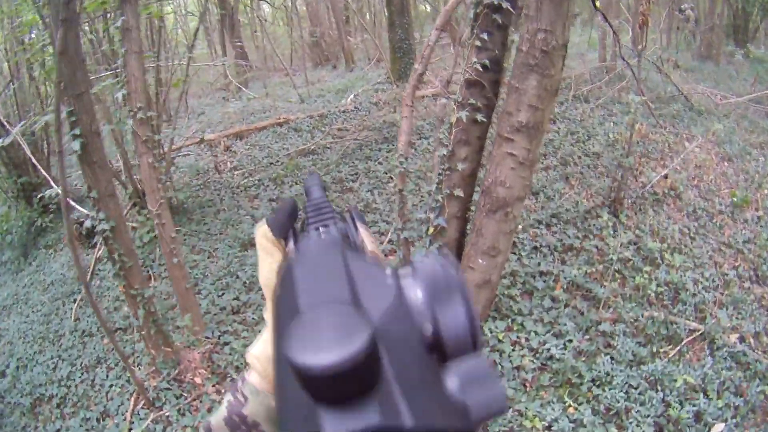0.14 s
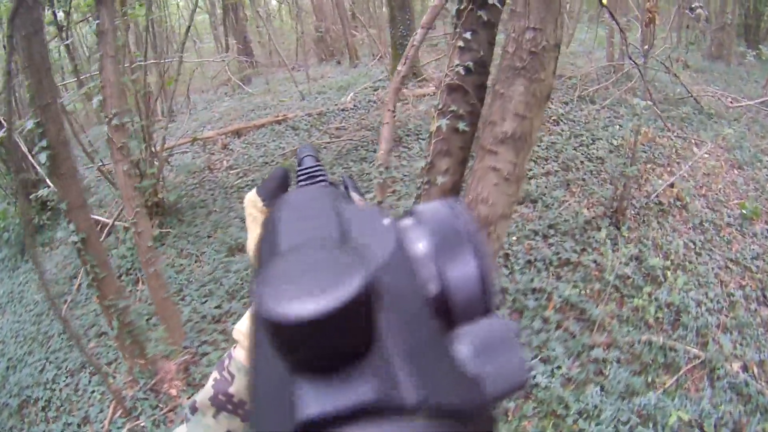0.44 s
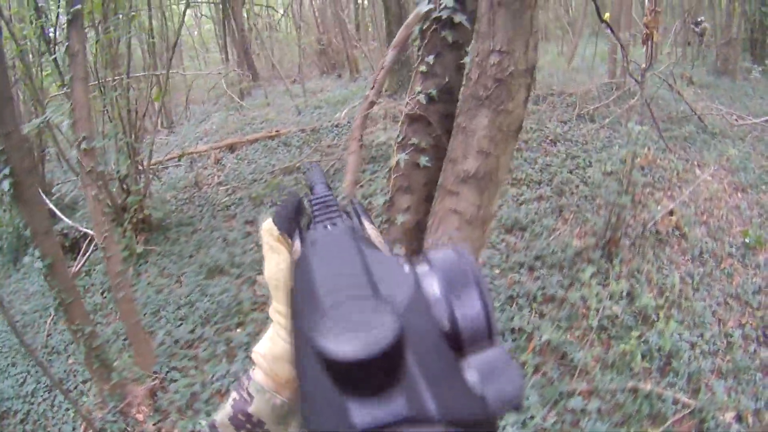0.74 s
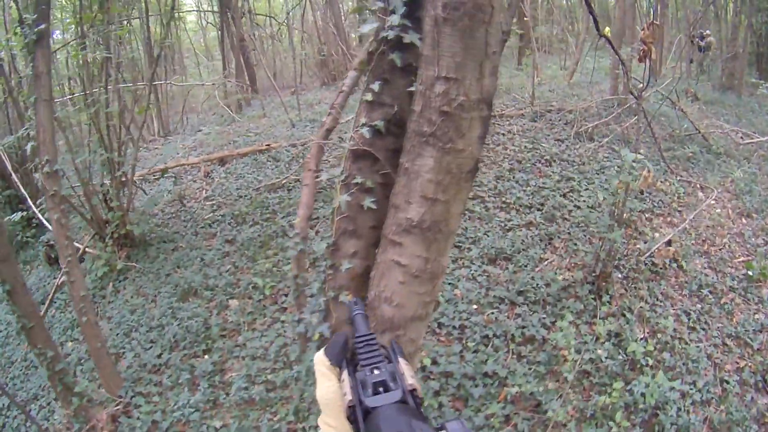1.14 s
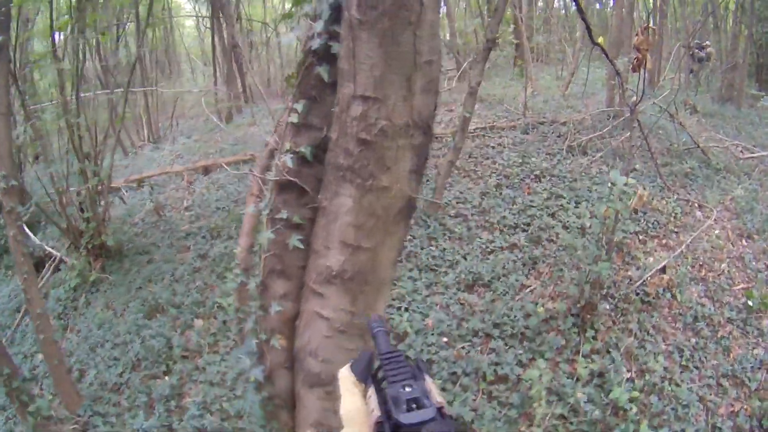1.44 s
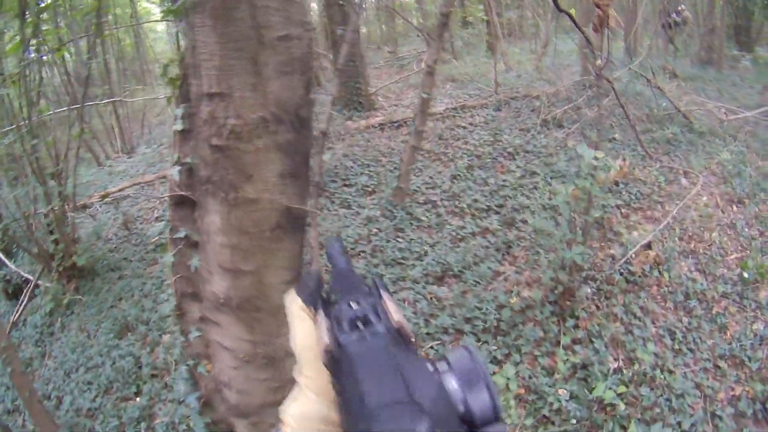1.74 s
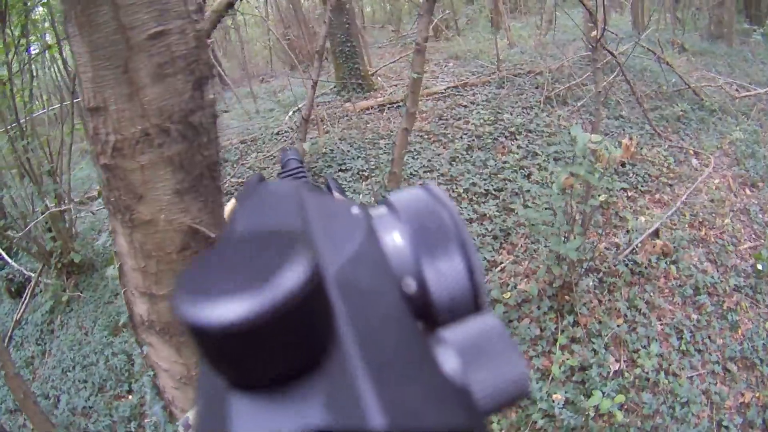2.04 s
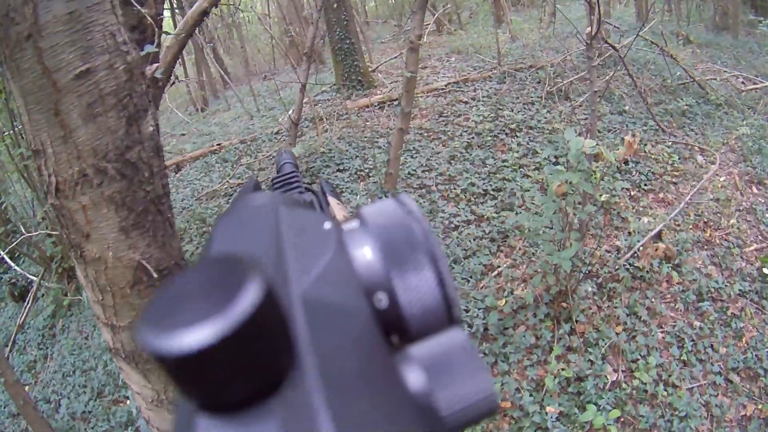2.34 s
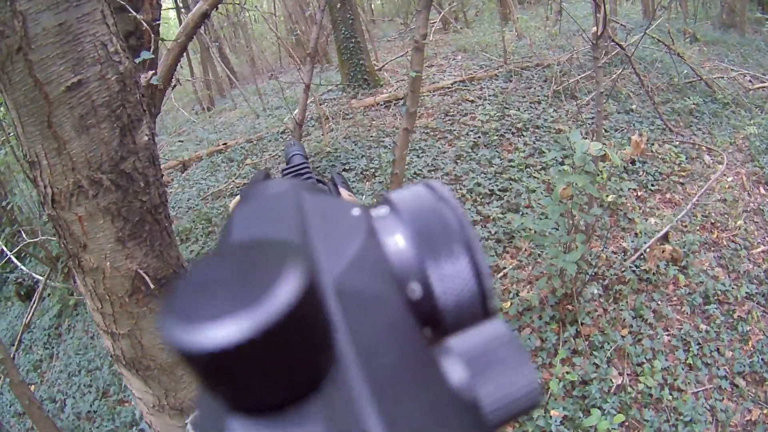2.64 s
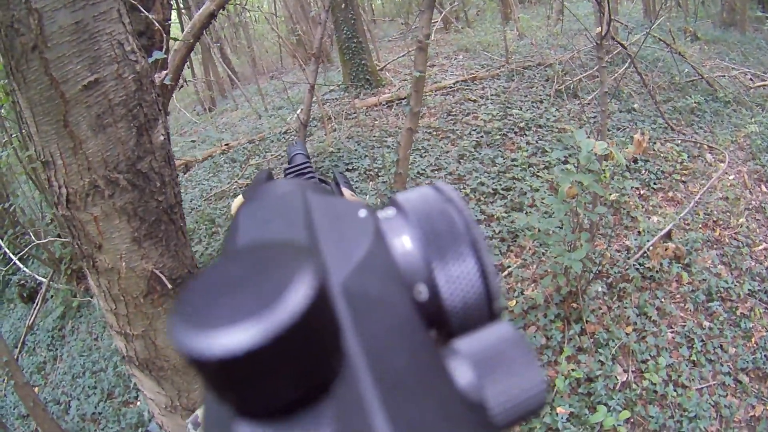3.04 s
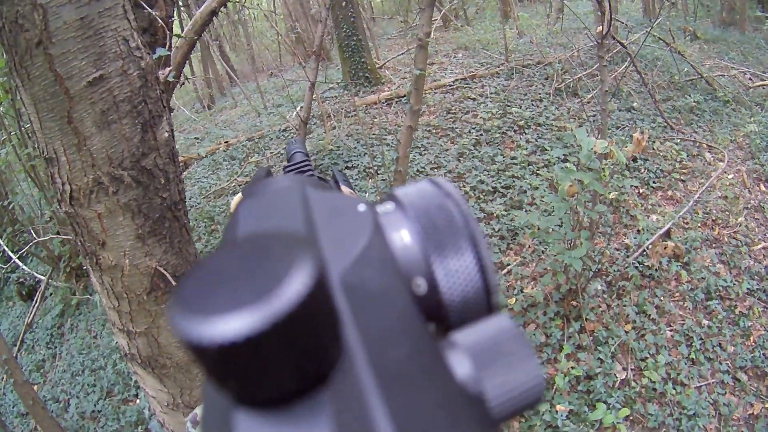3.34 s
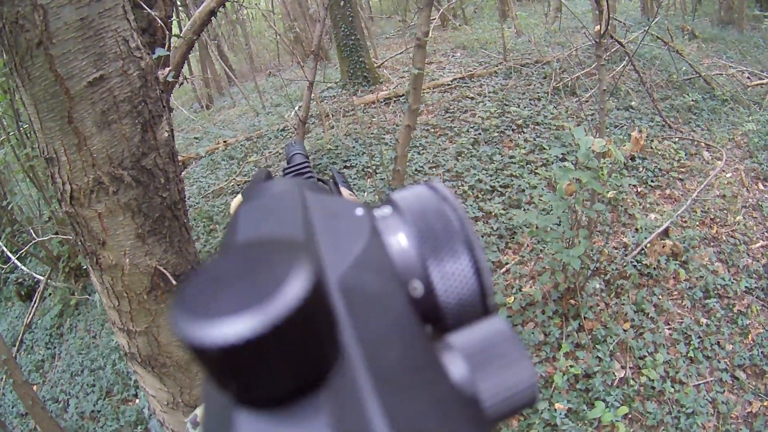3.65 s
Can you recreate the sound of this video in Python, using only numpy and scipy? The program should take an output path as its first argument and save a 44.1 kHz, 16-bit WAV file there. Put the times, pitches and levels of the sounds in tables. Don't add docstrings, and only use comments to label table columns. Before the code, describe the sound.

A toy rifle's motor whirrs and clatters through rapid bursts while distant bursts pop among trees

```python
import sys
import numpy as np
from scipy import signal
from scipy.fft import rfft, irfft, next_fast_len
from scipy.io import wavfile
from scipy.ndimage import uniform_filter1d

SR = 44100
rng = np.random.default_rng(int(sys.argv[2]) if len(sys.argv) > 2 else 0)


def makeup_ratio(level_db):
    decades = np.asarray(level_db, float) / 20
    return 10 ** decades


def unload_audio(sound):
    columns = np.transpose(np.atleast_2d(sound))
    steps = np.round(np.clip(columns, -1, 1) * 32767)
    wavfile.write(sys.argv[1], SR, steps.astype(np.int16))


N = 167580
T = np.arange(N) / SR


def unit(x):
    return x / np.sqrt(np.mean(x ** 2) + 1e-20)


def along(points, hz):
    f, v = np.transpose(points)
    return np.interp(np.log(hz + 1), np.log(f + 1), v)


def filtered(x, response):
    m = next_fast_len(len(x) + 8192)
    return irfft(rfft(x, m) * response(np.fft.rfftfreq(m, 1 / SR)), m)[:len(x)]


def resonances(peaks):
    def response(f):
        total = 0
        for k, (centre, width, db) in enumerate(peaks):
            total = total + (-1) ** k * makeup_ratio(db) * 1j * f * width / (centre ** 2 - f ** 2 + 1j * f * width)
        return total
    return response


def hiss(spectrum, patchy_db):
    z = signal.stft(rng.standard_normal(N), nperseg=128)[2]
    field = rng.standard_normal(z.shape)
    field = uniform_filter1d(uniform_filter1d(field, 4, 0), 3, 1)
    x = signal.istft(z * makeup_ratio(patchy_db * unit(field)), nperseg=128)[1][:N]
    return unit(filtered(x, lambda hz: makeup_ratio(along(spectrum, hz))))


def fall(s, t60):
    return (T >= s) * makeup_ratio(-60 * np.abs(T - s) / t60)


def add(out, s, x):
    part = out[round(s * SR):][:len(x)]
    part += x[:len(part)]


# (frequency [Hz], spectrum level [dB])
AIR_SPECTRUM = [(15, 3), (25, -1), (290, -21.5), (409, -26), (735, -27), (1040, -20), (1250, -22.5),
                (8070, -23), (14500, -27)]


def air():
    tone = np.sin(2 * np.pi * 1011 * T)
    return makeup_ratio(-59) * hiss(AIR_SPECTRUM, patchy_db=3.0) + makeup_ratio(-73) * tone


SHOT_DELAY_S = .0008
# (time [s], peak level [dB], treble level [dB])
FAR_SHOTS = [(0.1115, -34, 7), (0.165, -31.5, 3), (0.2153, -32.5, 3.5), (0.8733, -35.5, 4.5),
             (0.9244, -38, 9.5), (1.0166, -34, 4.5), (1.07, -33.5, 5), (1.1212, -32, 3.5), (1.2207, -32, 4),
             (1.273, -31, 3), (1.3243, -32.5, 6.5), (1.4212, -31, 3.5), (1.474, -32, 5), (1.5257, -30.5, 4),
             (1.6131, -32, 4.5), (1.6663, -31, 5), (1.716, -33.5, 6.5), (1.7982, -33, 6.5),
             (1.8513, -33.5, 8.5), (1.9016, -30, 2), (2.0118, -31.5, 4.5), (2.067, -30, 3.5),
             (2.117, -29, 3), (2.2842, -32.5, 8), (2.3381, -31, 4), (2.389, -31, 2.5), (2.5179, -31.5, 7)]
# (time [s], peak level [dB], treble level [dB])
FAINT_SHOTS = [(0.0553, -60, 5), (0.8175, -37, 6), (0.9525, -57, 21), (1.5044, -59, 5), (1.5722, -57, 15),
               (1.8555, -43.5, 18), (1.9403, -55.5, 20), (2.1918, -36, -2), (2.2374, -43.5, 6),
               (2.2549, -37, -8), (2.2749, -41.5, 6), (2.3105, -41, -10), (2.3665, -36, -7),
               (2.3783, -44, 13.5), (2.4226, -38, -14), (2.4792, -39, 1)]
# (frequency [Hz], width [Hz], level [dB])
MUZZLE_MODES = [(737, 113, 2.5), (1974, 280, 3), (3900, 6000, -11.5)]
# (frequency [Hz], width [Hz], level [dB])
SNAP_MODES = [(7900, 1300, -3), (11500, 3000, -16)]
# (delay [s], body level [dB], treble level [dB])
REFLECTIONS = [
    (.0012, -20, -4),
    (.0024, -22, -8),
    (.004, -14, -6),
    (.0072, -5, -13),
    (.013, -12, -14),
    (.018, -15, -13),
]


def far_rifle():
    pops, snaps = np.zeros(N), np.zeros(N)
    arrivals = [(0.00016, 0, 0)] + REFLECTIONS
    k = np.arange(22)
    for s, db, treble_db in FAR_SHOTS + FAINT_SHOTS:
        for i, (delay, body_db, bright_db) in enumerate(arrivals):
            late, loud = rng.standard_normal(2)
            at = s + SHOT_DELAY_S + delay * (1 + 0.041 * late)
            add(pops, at, -makeup_ratio([db + body_db + 2.1 * loud * (delay > 0)]))
            signs = np.sign(rng.standard_normal(22))
            grains = signs * makeup_ratio(2.5 * rng.standard_normal(22) - .7 * k)
            add(snaps, at, makeup_ratio(db + treble_db + bright_db) * grains)

    def muzzle(f):
        low_cut = (1j * f / (493 + 1j * f)) ** 2
        return resonances(MUZZLE_MODES)(f) * low_cut

    return makeup_ratio(23) * filtered(pops, muzzle) + makeup_ratio(15.5) * filtered(snaps, resonances(SNAP_MODES))


# (frequency [Hz], spectrum level [dB])
TREE_SPECTRUM = [(400, -32.5), (780, -18), (1250, -35.5), (2100, -17), (3300, -21.5), (5000, -14.5),
                 (8000, -9.5), (14000, -5.5)]
# (frequency [Hz], t60 [s])
TREE_DECAY = [(700, 0.81), (2000, 0.57), (8000, 0.57), (13000, 0.42)]


def trees():
    wash = np.zeros(N)
    for s, db, treble_db in FAR_SHOTS + FAINT_SHOTS:
        hz, t, z = signal.stft(rng.standard_normal(SR // 2), SR, nperseg=128)
        decay_db = -60 * t / along(TREE_DECAY, hz)[:, None]
        level_db = along(TREE_SPECTRUM, hz)[:, None] + decay_db + 0.85 * rng.standard_normal(z.shape)
        tail = signal.istft(z * makeup_ratio(level_db), SR, nperseg=128)[1]
        add(wash, s + SHOT_DELAY_S, makeup_ratio(db + treble_db) * tail / np.std(tail[:999]))
    return makeup_ratio(-10) * wash


# (time [s], length [s], start frequency [Hz], end frequency [Hz], level [dB])
SPIN_UPS = [
    (.306, .03, 800, 1000, -44),
    (2.546, .031, 930, 1270, -38),
]


def motor_spin_up():
    out = np.zeros(N)
    for s, length, from_hz, to_hz, db in SPIN_UPS:
        t = np.arange(int(length * SR)) / SR
        phase = 2 * np.pi * (from_hz + (to_hz - from_hz) * t / length / 2) * t
        swell = np.sin(np.pi * (t / length) ** 2)
        add(out, s, makeup_ratio(db) * swell * (np.sin(phase) + .6 * np.sin(3.0 * phase)))
    return out


# (time [s], peak level [dB])
RATCHET_TICKS = [(.3075, -36), (.3105, -38), (.3137, -23), (.3165, -25), (.7325, -18), (.7455, -19),
                 (.7592, -24), (.762, -26), (.770, -21), (.7865, -25), (.8147, -23), (.824, -35),
                 (.832, -34), (.838, -39)]
# (frequency [Hz], spectrum level [dB])
TICK_SPECTRUM = [(300, -54), (900, -6), (1700, -17), (4300, -8), (6000, -7), (14000, -3.5)]


def ratchet():
    strikes = sum(makeup_ratio(db) * fall(s, .019) for s, db in RATCHET_TICKS)
    return strikes * hiss(TICK_SPECTRUM, patchy_db=1.5)


# (motor on [s], motor off [s], rise time [s], gear level [dB])
TRIGGER_PULLS = [
    (.3203, .715, .002, -20.5),
    (2.558, 3.9, .002, -20.5),
]
# (frequency [Hz], spectrum level [dB])
GEAR_SPECTRUM = [(150, -35.5), (600, -24), (850, -8.5), (1200, -16), (1900, -17), (2350, -10), (3200, -8),
                 (14000, -4)]
SLAM_TIMES = [.3962, .473, .5477, .6222, .6983, 2.6084, 2.688, 2.7634, 2.8375, 2.9121, 2.9865, 3.0609,
              3.1353, 3.2095, 3.2837, 3.3581, 3.4323, 3.5066, 3.5808, 3.6548, 3.7292]


def gears():
    drive = np.zeros(N)
    for on_s, off_s, rise_s, db in TRIGGER_PULLS:
        coast = makeup_ratio(-60 * np.maximum(T - off_s, 0) / .2)
        drive += makeup_ratio(db) * np.clip((T - on_s) / rise_s, 0, 1) * coast
    caught = SLAM_TIMES[5:] + SLAM_TIMES[:4]
    jolt = 1 + makeup_ratio(-2.5) * sum(fall(s + .0185, t60=0.034) for s in caught)
    mesh = makeup_ratio(2 * np.sin(2 * np.pi * 137.8 * T))
    clatter = drive * jolt * mesh * hiss(GEAR_SPECTRUM, patchy_db=2)
    return filtered(clatter, lambda hz: makeup_ratio(-9 * np.exp(-((hz - 2750) / 90) ** 2)))


SLAM_DB = -30
# (frequency [Hz], spectrum level [dB])
RATTLE_SPECTRUM = [(120, -30), (300, -4.5), (800, -2.5), (1500, 13.5), (2200, -8), (3300, -17), (5000, -68),
                   (9000, -64)]


def rattle():
    out, loose = np.zeros(N), hiss(RATTLE_SPECTRUM, patchy_db=0.0)
    lead_s, length = .012, int(.04 * SR)
    swell = np.sin(np.pi * np.arange(length) / length)
    for s in SLAM_TIMES:
        start = s - lead_s
        add(out, start, makeup_ratio(SLAM_DB - 7) * swell * loose[round(start * SR):][:length])
    return out


# (delay [s], level [dB], crack level [dB], brightness [dB per octave])
SLAM_BLOWS = [
    (-.008, -13, -30, -2),
    (.0031, 4.5, -10, 3),
    (.0091, 7.5, -16, -.8),
    (.0128, -4, -26, -3),
]
# (frequency [Hz], level [dB], t60 [s])
SHELL_MODES = [(269, -15, 0.032), (410, -10.5, 0.052), (535, -1, 0.011), (674, 5.5, 0.019), (907, 8, 0.019),
               (1043, -6.5, 0.029), (1345, 5, 0.016), (1530, -29, 0.011), (1953, 11, 0.006)]


def piston_blows():
    out, t = np.zeros(N), np.arange(SR // 20) / SR
    crack = hiss(GEAR_SPECTRUM, patchy_db=3.4)
    attack = 1 - np.exp(-t / 0.00052)
    for s in SLAM_TIMES:
        for delay, blow_db, crack_db, tilt_db in SLAM_BLOWS:
            ring = np.zeros(len(t))
            for hz, level, t60 in SHELL_MODES:
                louder, sharper = rng.standard_normal(2)
                mode_db = level + tilt_db * np.log2(hz / 1000) + 1.6 * louder - 60 * t / t60
                ring += makeup_ratio(mode_db) * np.sin(2 * np.pi * hz * (1 + 0.004 * sharper) * t)
            at = s + delay + 0.0004 * rng.standard_normal()
            add(out, at, makeup_ratio(SLAM_DB + blow_db) * ring * attack)
            crack_fall = makeup_ratio(SLAM_DB + crack_db + 30.5 - 60 * t / 0.011)
            add(out, at, crack_fall * crack[round(at * SR):][:len(t)])
    return out


def air_push():
    out, t = np.zeros(N), np.arange(SR // 20) / SR
    push = np.sin(2 * np.pi * 120 * t) * makeup_ratio(-60 * t / 0.044) * (1 - np.exp(-t / 0.0051))
    for s in SLAM_TIMES:
        add(out, s - 0.0063, makeup_ratio(SLAM_DB + 11) * push)
    return out


# (multiple of the whine frequency, level [dB])
WHINE_HARMONICS = [(1, 0), (2, -9), (3, 2), (6, -2)]


def loaded_whine():
    out = np.zeros(N)
    length_s, end_s, lap_s = .042, .009, .0743
    t = np.arange(int(length_s * SR)) / SR
    swell = np.sqrt(np.sin(np.pi * t / length_s))
    for s, lap in zip(SLAM_TIMES, np.diff(SLAM_TIMES, prepend=0)):
        if lap >= 2 * lap_s:
            continue
        turns = 885 * lap_s / lap * (t - .12 * t ** 2 / length_s / 2)
        whine = np.zeros(len(t))
        for order, level in WHINE_HARMONICS:
            louder, phase = rng.standard_normal(2)
            whine += makeup_ratio(level + louder) * np.sin(2 * np.pi * order * turns + 3 * phase)
        add(out, s - end_s - length_s, makeup_ratio(SLAM_DB - 9) * swell * whine)
    return out


def scene():
    far = air() + far_rifle() + trees()
    drive = motor_spin_up() + ratchet() + gears()
    slams = rattle() + piston_blows() + air_push() + loaded_whine()
    return (far + drive + slams)[None]


def low_pass(x):
    return signal.sosfilt(signal.butter(12, 14900, fs=SR, output="sos"), x)


# (frequency [Hz], gain [dB])
HOUSING = [(6850, 1.5), (7200, 7), (8300, 5.5), (9500, 0.66), (10900, -6.5), (11800, -13), (12600, -10.5),
           (13900, -23)]


def record(dry):
    x = filtered(dry[0], lambda hz: makeup_ratio(along(HOUSING, hz)))
    clip_top, hardness = .125, 4
    x = x / (1 + np.abs(x / clip_top) ** hardness) ** (1 / hardness)

    def mean_power(seconds):
        rate = 1 / (seconds * SR)
        return signal.lfilter([rate], [1, rate - 1], x ** 2)

    power = np.minimum(mean_power(0.43), mean_power(0.055))
    x = x * (1 + power / makeup_ratio(2 * -26.5)) ** -0.4
    mix = filtered(x, lambda hz: hz < 13950)[None]
    return low_pass(mix)


dry = scene()
out = record(dry)
unload_audio(out)
```